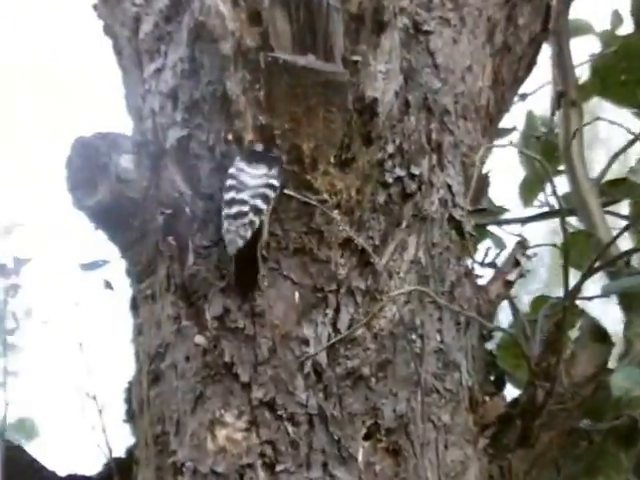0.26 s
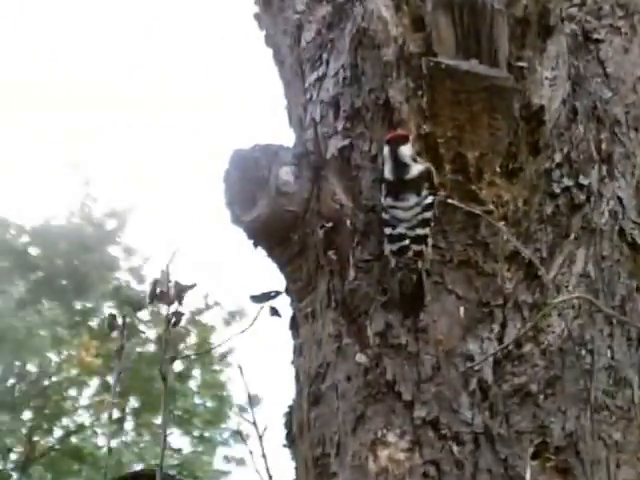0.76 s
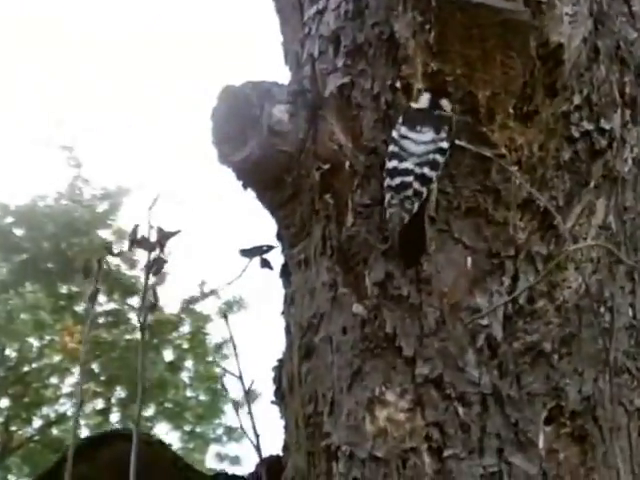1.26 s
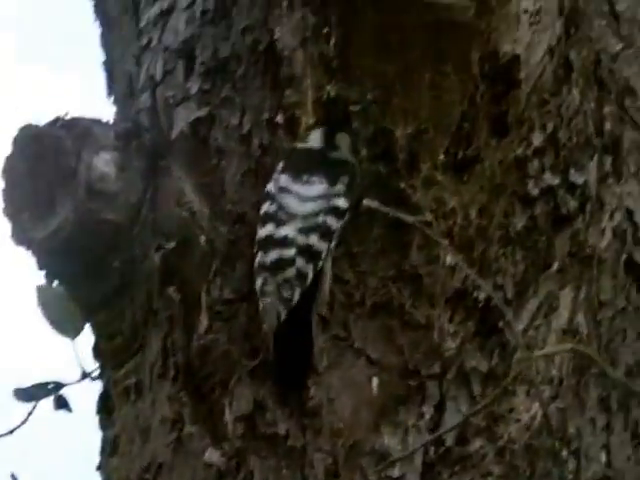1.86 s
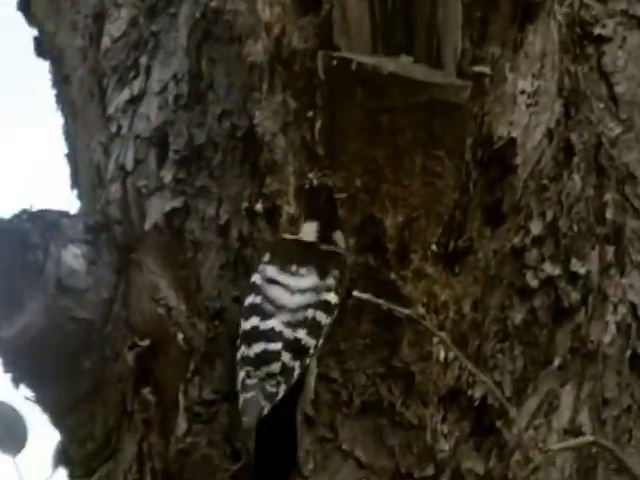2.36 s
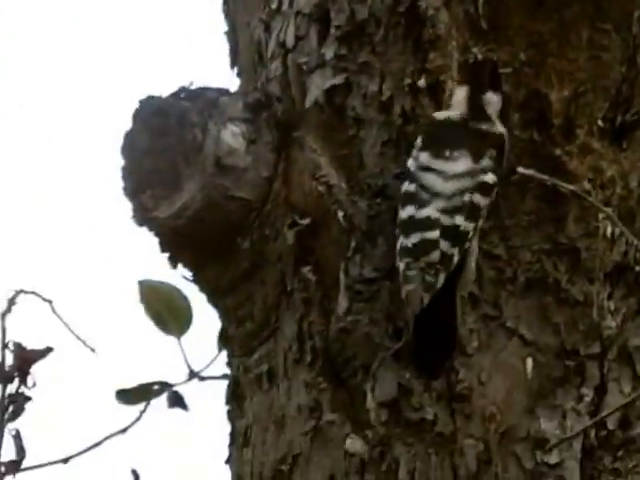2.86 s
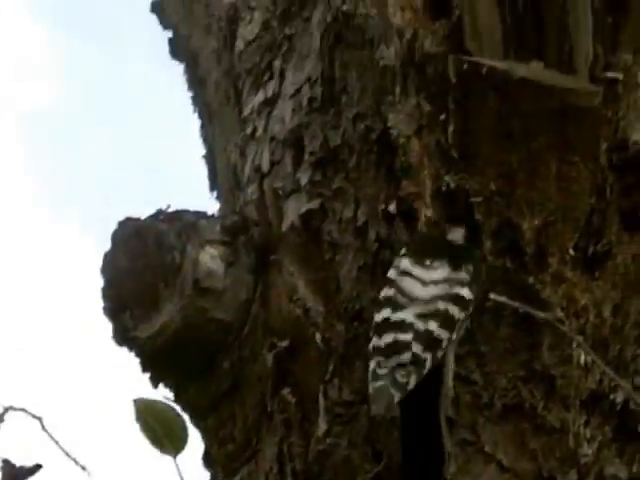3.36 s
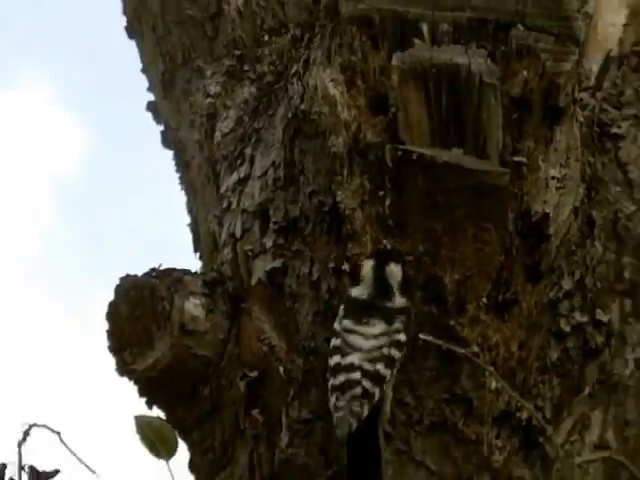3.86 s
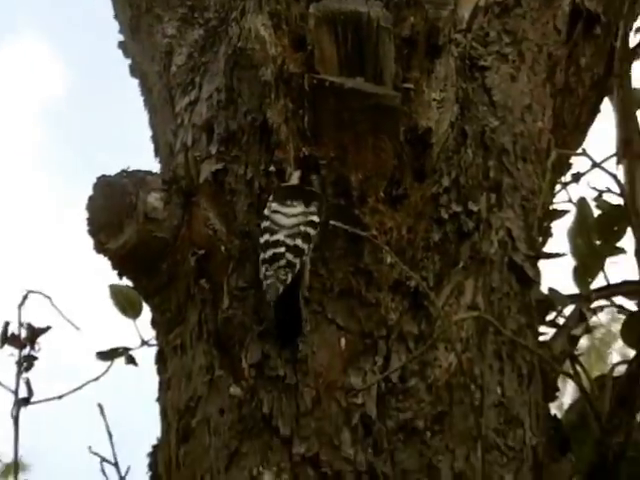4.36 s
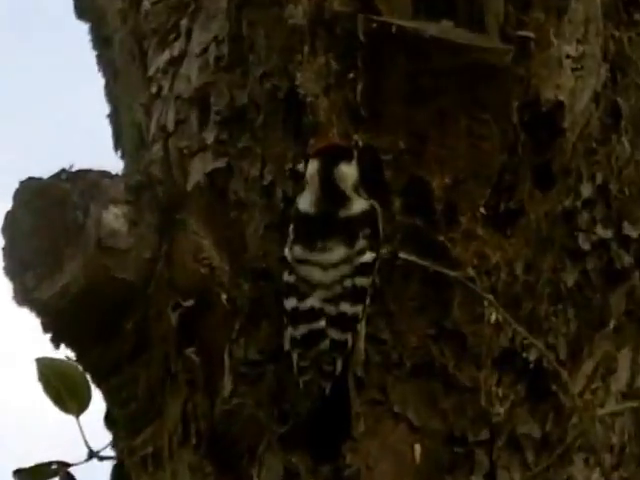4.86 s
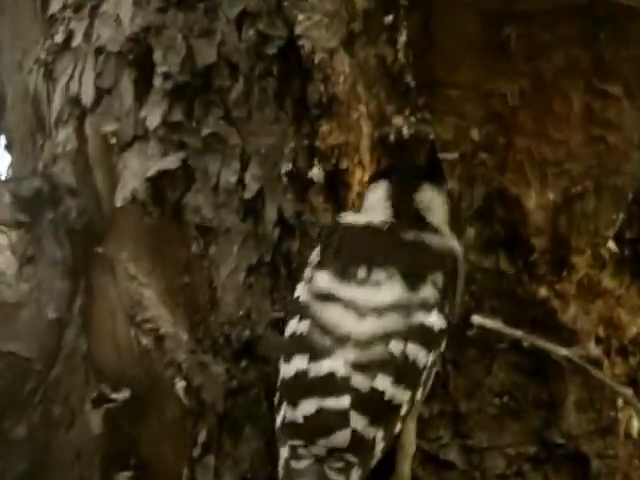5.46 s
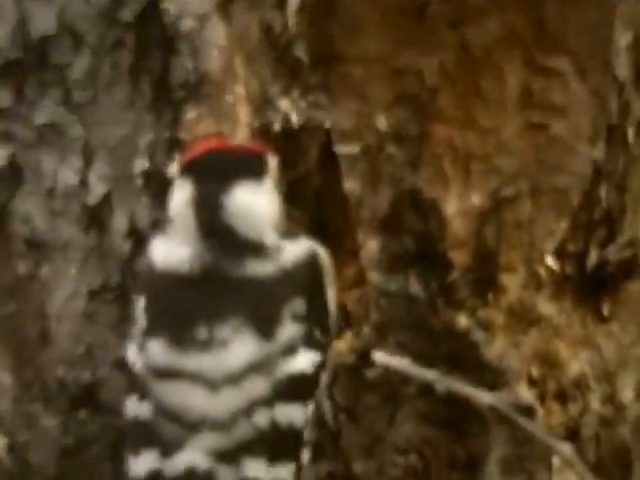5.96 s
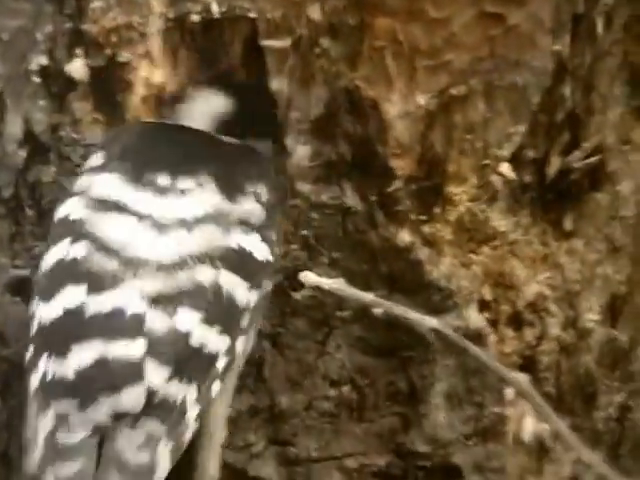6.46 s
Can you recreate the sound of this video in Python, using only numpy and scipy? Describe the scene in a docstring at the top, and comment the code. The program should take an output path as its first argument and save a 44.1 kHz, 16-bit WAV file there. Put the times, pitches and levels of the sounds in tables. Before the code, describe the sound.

After nearly a second of near silence, a small woodpecker a few metres away hammers a rapid, even, hollow roll lasting one second. A soft low wash remains, with dull, far-off knocks and very faint thin bird notes. A second, slightly longer and more uneven roll follows to the end. A compact camera's microphone sounds band-limited, with fine crackle on the left channel.

```python
"""In a wood, a small woodpecker drums two even rolls on a dead trunk a few metres from a compact camera.
Each blow excites damped modes of the hollow wood and returns from nearby trunks, ground and leaves.
Far knocks are decaying partials, songbirds are gliding sine tones, and a low wash is coloured noise.
A byte slip in the camera's left channel crackles whenever the sound crosses a step."""
import sys
import numpy as np
from scipy import signal
from scipy.fft import rfft, irfft
from scipy.io import wavfile
from scipy.ndimage import uniform_filter1d

SR = 44100
rng = np.random.default_rng(int(sys.argv[2]) if len(sys.argv) > 2 else 0)


def output_pcm(signal):
    """Save a mono or channel-first signal as 16-bit PCM at the path in sys.argv[1].

    Samples are clipped to [-1, 1] before scaling.
    """
    pcm = np.clip(np.atleast_2d(signal).T, -1, 1) * 32767
    wavfile.write(sys.argv[1], SR, np.round(pcm).astype(np.int16))


def level_to_linear(level):
    """Convert decibel levels to linear amplitude factors, elementwise."""
    exponent = np.asarray(level, float) / 20
    return 10 ** exponent


N = 296173
LEAD_S = 0.0017  # the beak touches this long before the full blow


def coloured(colour, rms_db):
    """Spectral shaping: white noise is weighted along a curve of (Hz, dB) points and set to an rms level."""
    hz, db = np.transpose(colour)
    f = np.maximum(np.fft.rfftfreq(N, 1 / SR), 1)
    weight = level_to_linear(np.interp(np.log(f), np.log(hz), db))
    x = irfft(rfft(rng.standard_normal(N)) * weight, N)
    return x / x.std() * level_to_linear(rms_db)


def walk(per_s):
    """Slow random modulation: held random values, per_s a second, are smoothed twice and set to spread 1."""
    hold = int(SR / per_s)
    x = np.repeat(rng.standard_normal(N // hold + 1), hold)
    x = uniform_filter1d(uniform_filter1d(x, hold), hold)[:N]
    return x / x.std()


def band(x, lo_hz, hi_hz, order=2):
    """Band limitation: a Butterworth band-pass."""
    return signal.sosfilt(signal.butter(order, [lo_hz, hi_hz], "band", fs=SR, output="sos"), x)


def decay(t, t60):
    """Exponential damping: the amplitude falls by 60 dB in t60 seconds."""
    return np.exp(-np.log(1000) * t / t60)


def add(out, x, s):
    """Superposition: mix x into out at time s."""
    i = int(round(s * SR))
    out[i:i + len(x)] += x[:len(out) - i]


def forest():
    """Broadband noise of many sources: a wash swells and flickers a little over a steady rumble."""
    # course of the wash of leaves and far traffic: start_s, rms_db
    wash_course = [(0, -87.5), (.4, -74.5), (0.901, -69.5), (2.102, -64.5), (3.76, -65), (4.62, -64),
                   (5, -65.5), (6.45, -63), (6.72, -61.5)]
    # spectrum of the wash: frequency_hz, relative_level_db
    wash_colour = [(150, -20.5), (280, -2.5), (430, 0), (560, -2), (720, -4.5), (1100, -10), (1400, -18.5),
                   (2200, -22), (4500, -23.5), (5600, -31.5), (8000, -45.5)]
    # spectrum of the rumble: frequency_hz, relative_level_db
    rumble_colour = [(15, -9), (35, -8.5), (48, 2), (68, -7.5), (110, -8), (180, -13), (280, -18.5),
                     (600, -24), (1500, -42)]
    s, db = np.transpose(wash_course)
    flicker_db = .8 * walk(14)
    wash = coloured(wash_colour, 0) * level_to_linear(np.interp(np.arange(N) / SR, s, db) + flicker_db)
    rumble = coloured(rumble_colour, -66) * level_to_linear(1.4 * walk(3))
    return wash + rumble


def ring(modes, loose, t, scatter_db=2.67, detune=0.011):
    """Modal superposition: damped sines whose levels and phases vary with the spot that is hit; rms 1."""
    hz, db, t60 = np.transpose(modes)[:, :, None]
    size, pitch, spot = rng.standard_normal((3, len(hz), 1))
    phase = 2 * np.pi * hz * (1 + detune * pitch) * t + loose * spot
    x = (level_to_linear(db + scatter_db * size) * decay(t, t60) * np.sin(phase)).sum(axis=0)
    return x / x.std()


def blow(family_db, rise_s):
    """Impact excitation: a push builds over milliseconds; the ring ends as the wave runs off along the trunk."""
    # the trunk's modes in four families, main, upper, bright and thud: frequency_hz, level_db, t60_s
    trunk_modes = [
        [(753.6, -20, 0.031), (855, -11.5, 0.087), (999.3, -4, 0.049), (1061.4, -1.5, 0.033), (1135, -7, 0.026)],
        [(1665, 0.5, 0.025), (1761.5, -6, 0.024), (1550, -15, 0.042), (1350, -12.5, .025)],
        [(2100, 1.5, 0.022), (2391, 0, 0.019), (2603, -1.5, 0.018), (3180, -14, .022), (3544, -15.5, 0.017),
         (3935, -11.5, 0.016), (4250, -22.5, 0.012)],
        [(69, -8.5, 0.055), (181, -7, 0.031), (309.2, -7.5, 0.051), (454, -1.5, 0.026), (594, -0.5, .05)],
    ]
    # scatter of each family's starting phase: scatter_rad
    phase_scatter = [0.14, 0.13, 1.6, 1.5]
    gone_s = .0098  # the ring has halved by this time, beyond its damping
    t = np.arange(1024) / SR - LEAD_S
    x = sum(level_to_linear(db) * ring(modes, loose, t)
            for db, modes, loose in zip(family_db, trunk_modes, phase_scatter))
    # fibres crack under the beak, in proportion to the bright modes
    crack = band(rng.standard_normal(len(t)), 900., 2600., order=1) * decay(t, 0.059)
    crack_db = family_db[2] - 6
    x = x + level_to_linear(crack_db) * band(crack / crack.std(), 500., 3900.)
    push = 1 - np.exp(-((t + LEAD_S) / rise_s) ** 2)
    x = x * push / (1 + (np.abs(t) / gone_s) ** 10.)
    return x / np.abs(x).max()


def rolls():
    """Repeated impacts: harder blows raise the upper and bright modes and the thud."""
    # beak blows: start_s, peak_db, hardness_db (level of the upper modes)
    blows = [(0.9379, -17, -3), (1.0004, -17, -3.5), (1.0557, -15, -4), (1.11, -13, -2), (1.164, -12, -2.1),
             (1.218, -9.5, -1.5), (1.2735, -8.5, -0.5), (1.3278, -10.5, 1.5), (1.383, -11, -2),
             (1.438, -9.5, -1), (1.4947, -13, -2.5), (1.5512, -12, -2), (1.6072, -9.5, -3.5),
             (1.6639, -9.5, 2.5), (1.7196, -11.5, -2), (1.776, -11.5, -1), (1.835, -11.5, 0),
             (1.8931, -10, 0.5), (1.953, -12, -2), (5.215, -19, -9.5), (5.2817, -16, -4.5),
             (5.3348, -15, -3.5), (5.3908, -13.5, -4.5), (5.4433, -10.5, -2.5), (5.4975, -10.5, 0),
             (5.5511, -11.5, -4), (5.605, -14, -8.5), (5.6574, -11, -1.5), (5.7138, -8.5, -0.5),
             (5.7686, -15.5, -12.5), (5.8248, -15.5, -9), (5.8796, -14, -5.5), (5.9338, -13.5, -8),
             (5.99, -19.5, -8), (6.0473, -12, -7), (6.1022, -12, -3.5), (6.1579, -11, -5),
             (6.2155, -14.5, -4.5), (6.2732, -12.5, -5.5), (6.3301, -15.5, -4)]
    out = np.zeros(N)
    for s, peak_db, hard_db in blows:
        a, b, c = rng.standard_normal(3)
        # level at zero hardness, rise in dB per dB of hardness, scatter in dB
        bright_db = -13.5 + 0.086 * hard_db + 3.5 * a
        thud_db = -19.5 + 0.56 * hard_db + 2 * b
        rise_s = 0.0027 * np.exp(0.13 * c)
        hit = blow([0, hard_db, bright_db, thud_db], rise_s)
        add(out, level_to_linear(peak_db) * hit, s - LEAD_S)
    return out


def rustle(back, lo_hz, hi_hz):
    """Diffuse scattering: moving leaves return noise that follows the echoes' envelope in a band."""
    envelope = uniform_filter1d(np.abs(band(back, lo_hz, hi_hz)), size=128)
    return band(rng.standard_normal(N), lo_hz, hi_hz) * envelope


def drumming():
    """Reflection and scattering: the rolls convolve with discrete echoes and a short tail of the wood."""
    # returns from neighbouring trunks and the ground: delay_s, level_db (before the mix below)
    echoes = [(0.0173, -17.5), (.023, -23.5), (.032, -30), (.036, -29), (.058, -38)]
    direct = rolls()
    t = np.arange(SR // 3) / SR
    wood = level_to_linear(-49) * rng.standard_normal(len(t)) * decay(t, 0.34) * (t > .008)
    for delay, db in echoes:
        wood[int(delay * SR)] += level_to_linear(db)
    back = signal.fftconvolve(direct, wood)[:N]
    # trunks return the low ring best and some of the bright part; leaves scatter mostly around the low ring,
    # less above it
    trunks = level_to_linear(3.5) * band(back, 550., 980.) + level_to_linear(-16) * back + level_to_linear(-7) * band(back, 2000., 4500.)
    leaves = level_to_linear(11) * rustle(back, 650., 1150.) + level_to_linear(2) * rustle(back, 1200., 2800.)
    return direct + trunks + leaves


def knocks():
    """Inharmonic partials: each knock swells for a few cycles, with a soft noise thud that lingers."""
    # dull knocks further off: start_s, level_db (peak of the lowest partial), pitch_hz
    far_knocks = [(2.347, -56.5, 565), (2.574, -49.5, 543), (2.82, -46.5, 512), (3.074, -46.5, 499),
                  (3.313, -49, 499), (3.584, -48.5, 564.6), (4.565, -52, 443), (4.799, -51.5, 538)]
    out, t = np.zeros(N), np.arange(3000) / SR
    u = t / .0035  # time over the moment of fullest swell
    swell = u * np.exp(1 - u)
    for s, level_db, hz in far_knocks:
        # frequency ratio and level in dB of each partial
        tone = sum(level_to_linear(db) * np.sin(2 * np.pi * ratio * hz * t)
                   for ratio, db in [(1, 0), (1.45, -10.5), (1.95, -11.5)])
        thud = band(rng.standard_normal(len(t)), 280., 1100.) * decay(t, 0.16)
        add(out, level_to_linear(level_db) * (swell * tone + level_to_linear(3.5) * thud), s)
    return out


def songbird(notes, waver):
    """Frequency modulation: thin tones waver by a share of their pitch, flutter and reverberate in the trees."""
    out, wobble = np.zeros(N), 1 + waver * walk(250)
    for s, length, hz, db in notes:
        i, n = int(s * SR), int(length * SR)
        climb = 1 + 0.0092 * np.linspace(-.5, .5, n)  # the pitch rises by this share through a note
        pitch = hz * climb * wobble[i:i + n]
        tone = np.sin(2 * np.pi * np.cumsum(pitch) / SR)
        add(out, level_to_linear(db) * signal.windows.tukey(n, .5) * tone, s)
    song = out * level_to_linear(2.5 * walk(50))  # flutter of 2.5 dB
    t = np.arange(SR // 4) / SR
    trees = level_to_linear(-33) * rng.standard_normal(len(t)) * decay(t, .3)
    return song + signal.fftconvolve(song, trees)[:N]


def warbling_bird():
    """Wide frequency modulation: one distant bird warbles on lower, unsteady notes."""
    # warbled notes: start_s, length_s, pitch_hz, level_db (tone amplitude before flutter)
    warbles = [(2.395, .065, 4170, -86.5), (2.43, 0.071, 3040, -83), (2.48, 0.092, 2750, -72),
               (2.59, 0.088, 3250, -75), (2.61, .11, 3680, -68), (2.78, 0.037, 3150, -77.5),
               (2.86, .07, 3700, -72), (3.41, 0.055, 3620, -76.5), (3.6, 0.095, 2870, -79),
               (4.43, 0.23, 2850, -72), (4.76, .13, 4320, -78.5), (5.07, 0.12, 2720, -78.5)]
    return songbird(warbles, .024)


def whistling_bird():
    """Narrow frequency modulation: another distant bird repeats a steadier high whistle."""
    # whistled notes: start_s, length_s, pitch_hz, level_db (tone amplitude before flutter)
    whistles = [(2.84, 0.187, 4810, -81), (3.175, .13, 4940, -69.5), (3.47, 0.098, 4857, -72),
                (3.69, 0.096, 4687, -79.5), (4.14, .08, 4920, -80), (4.52, 0.16, 4740, -78),
                (4.95, 0.14, 4760, -80.5), (6.5, .15, 5210, -80)]
    return songbird(whistles, .009)


def scene():
    """Superposition at one point: one microphone feeds both channels."""
    mono = forest() + drumming() + knocks() + warbling_bird() + whistling_bird()
    return np.tile(mono, (2, 1))


def byte_slip(right):
    """Quantisation steps: each lower byte is paired with the upper byte of the sample before."""
    step = 1 / 256  # step of the upper byte, full scale 1
    high = np.floor(right / step) * step
    low = right - high
    return low + np.roll(high, 1)


def roll_off(x):
    """The treble ends steeply here."""
    return signal.sosfilt(signal.butter(12, 8870, fs=SR, output="sos"), x)


def record(dry):
    """Sampling at 16 kHz: the microphone's hiss and a standing offset join, and the left channel slips a byte."""
    up, down = 441, 160  # 44100 Hz over 16000 Hz
    hiss = level_to_linear(-80) * band(rng.standard_normal(N), 300., 7000.)  # level before the band-pass
    offset = .00195  # standing offset of the converter, full scale 1
    right = signal.resample_poly(dry[0] + hiss, down, up) + offset
    left = byte_slip(right)
    both = signal.resample_poly([left, right], up, down, axis=1, padtype="line")[:, :N]
    both = signal.sosfiltfilt(signal.butter(8, 8900., fs=SR, output="sos"), both)
    noise_floor = level_to_linear(-96.5) * rng.standard_normal(both.shape)
    return roll_off(both + noise_floor)


dry = scene()
out = record(dry)
output_pcm(out)
```